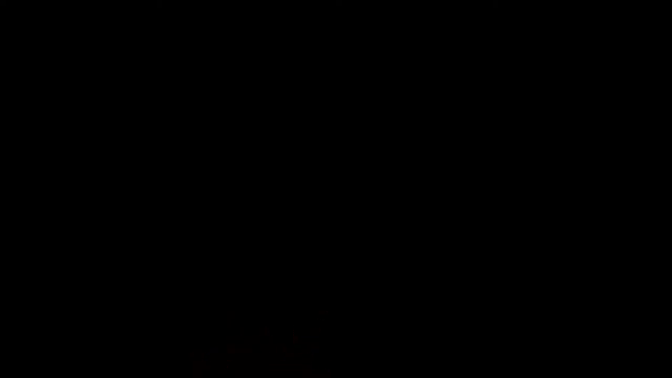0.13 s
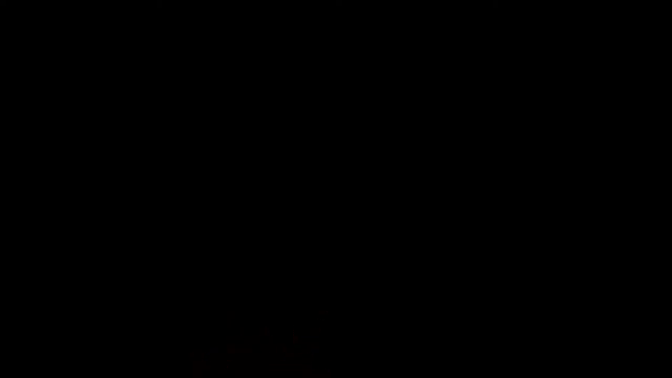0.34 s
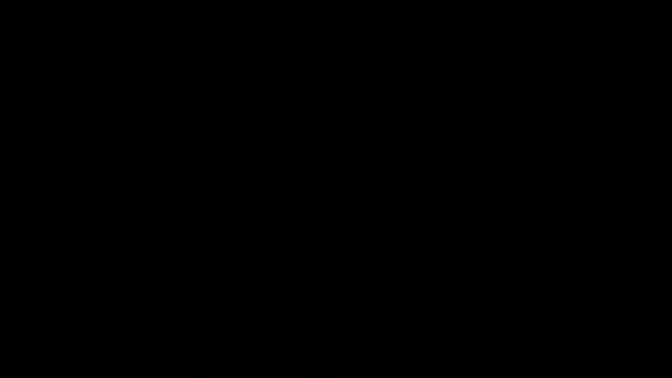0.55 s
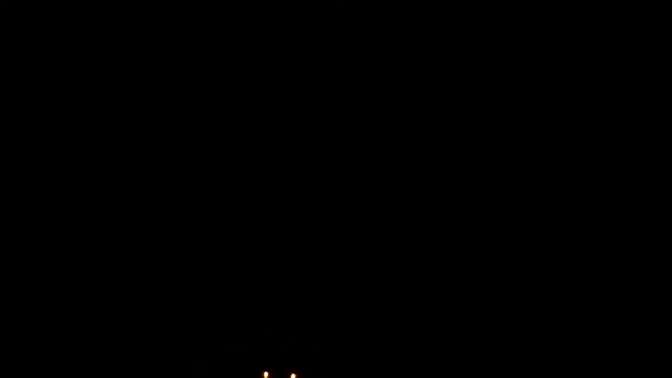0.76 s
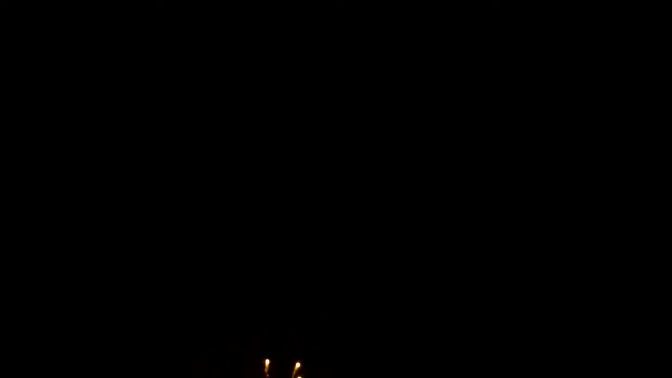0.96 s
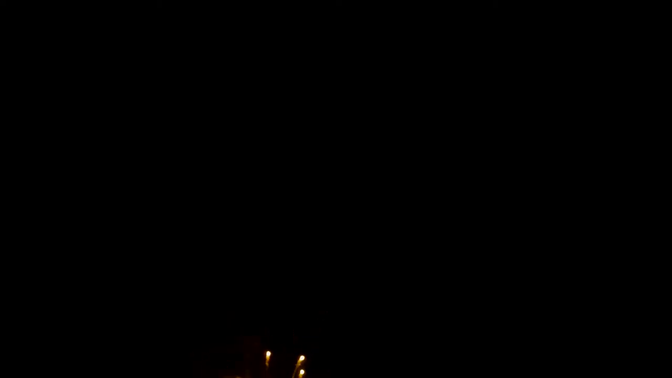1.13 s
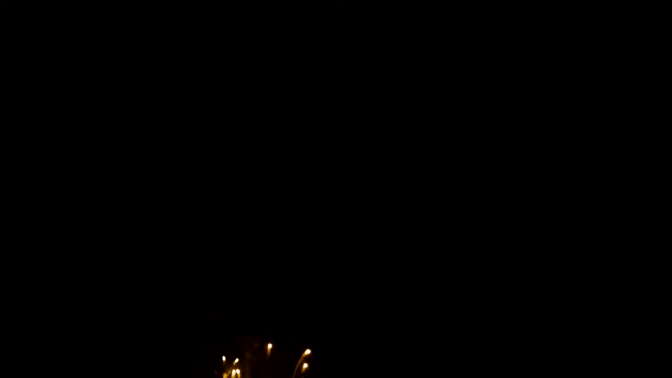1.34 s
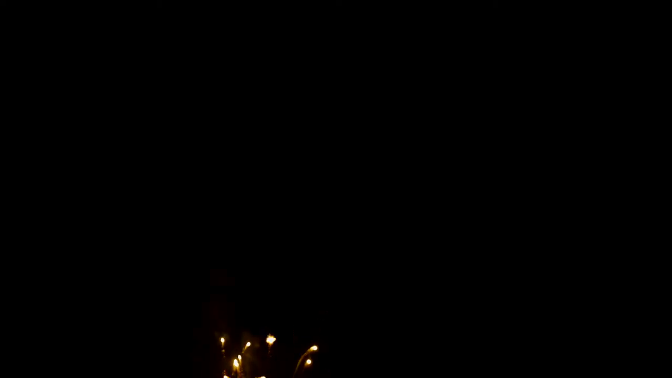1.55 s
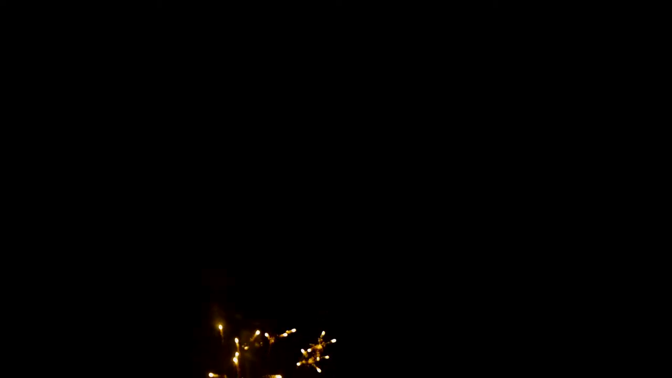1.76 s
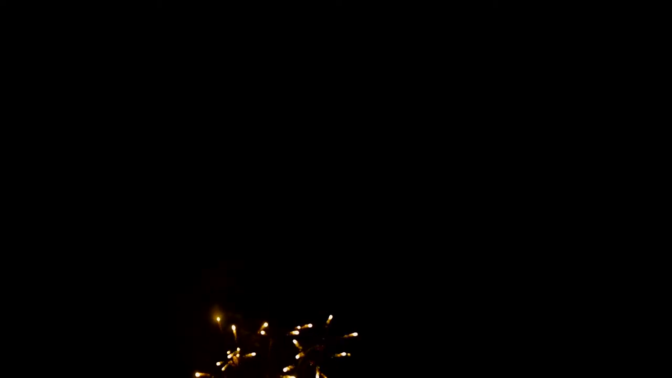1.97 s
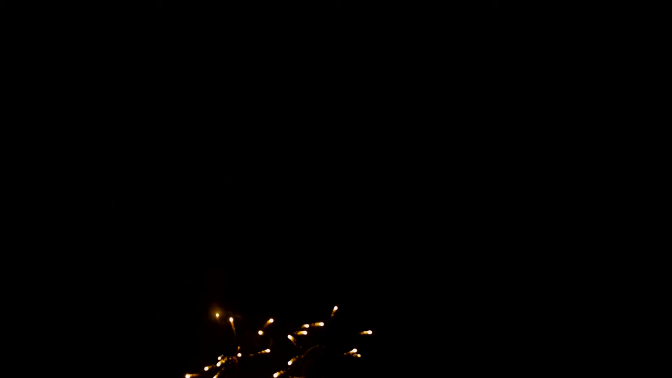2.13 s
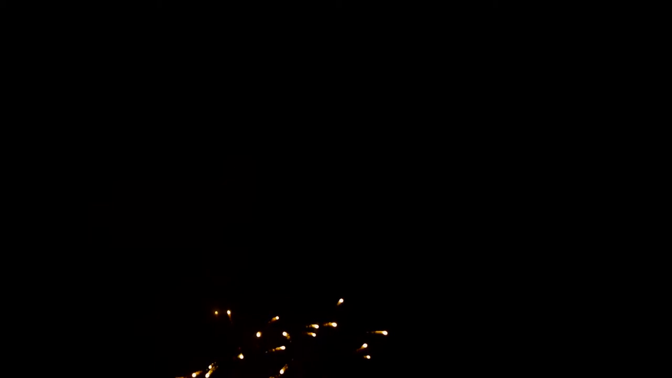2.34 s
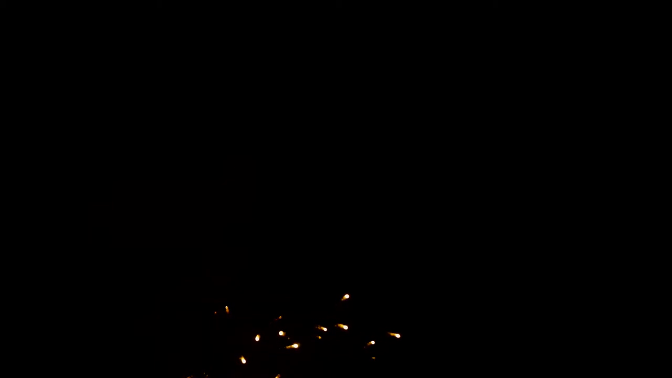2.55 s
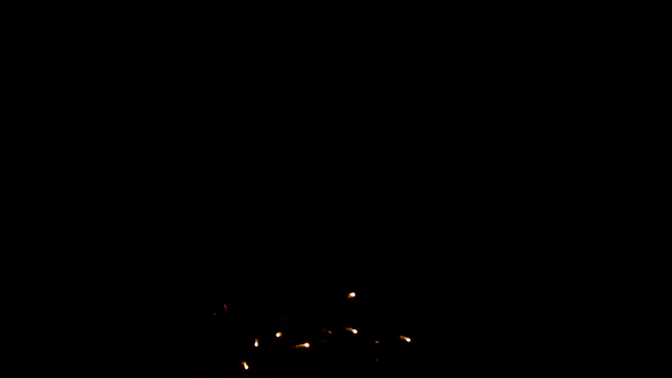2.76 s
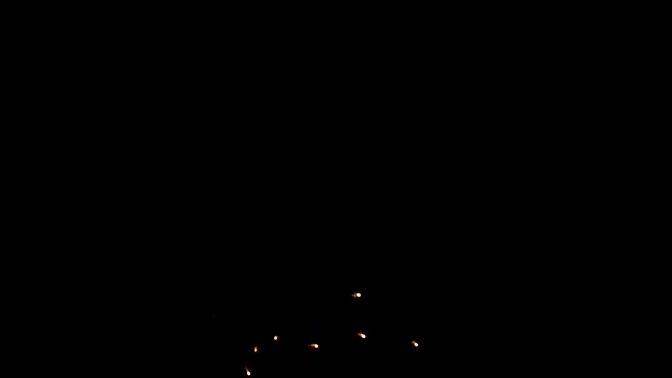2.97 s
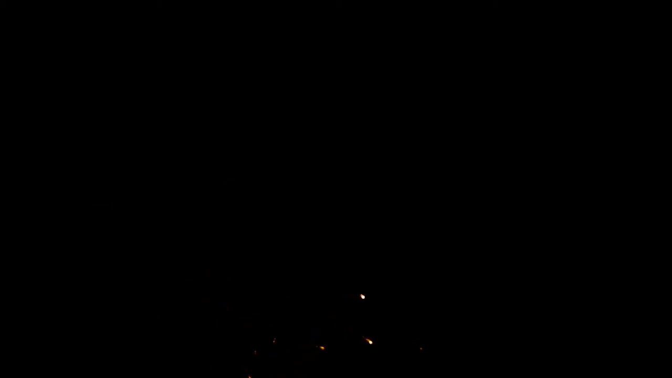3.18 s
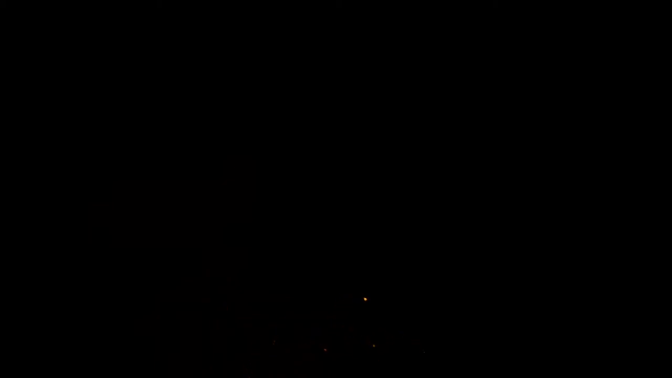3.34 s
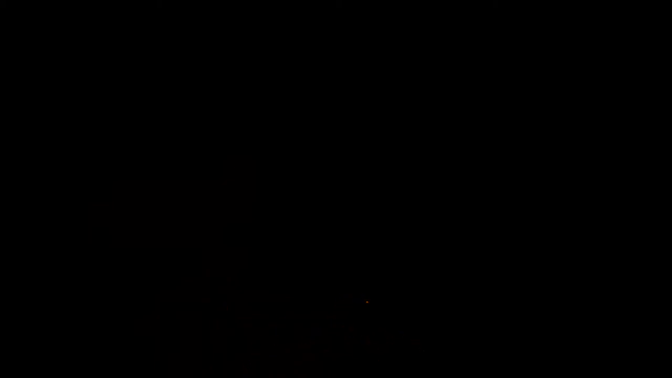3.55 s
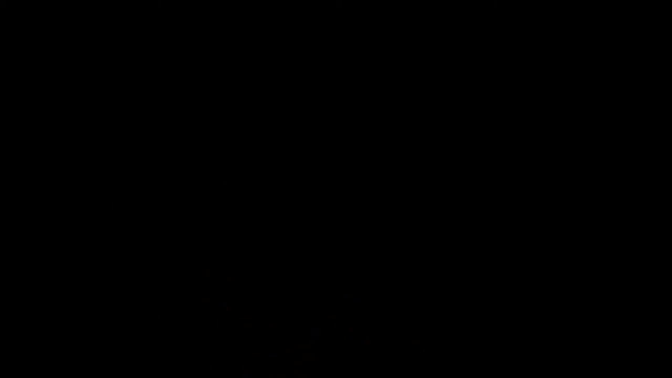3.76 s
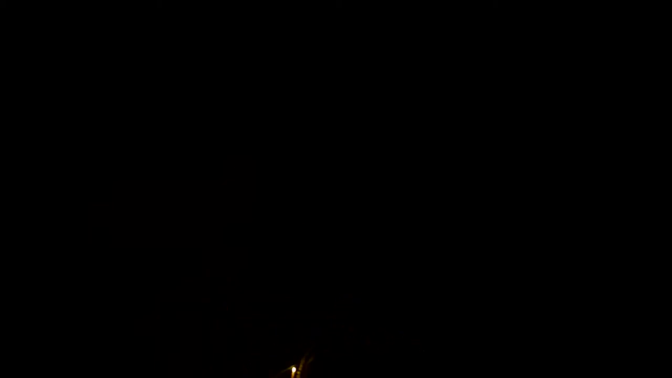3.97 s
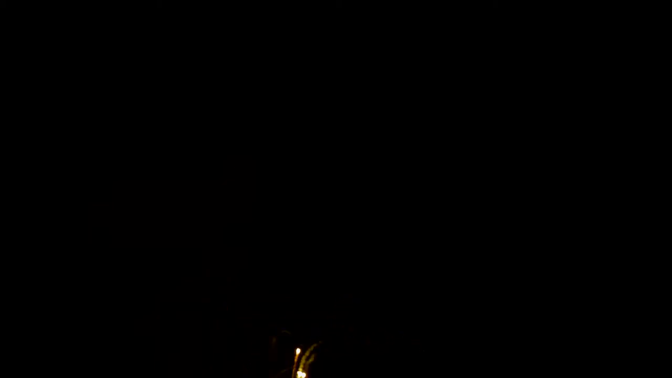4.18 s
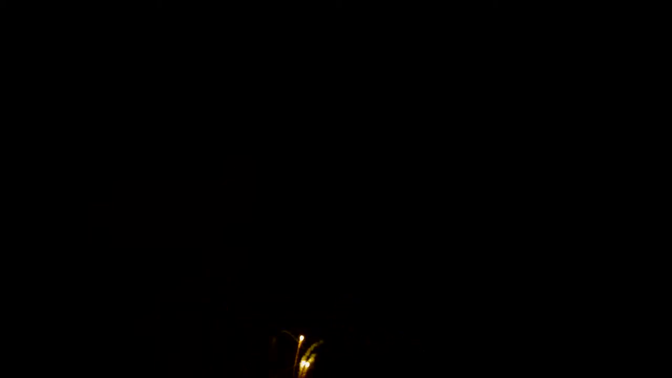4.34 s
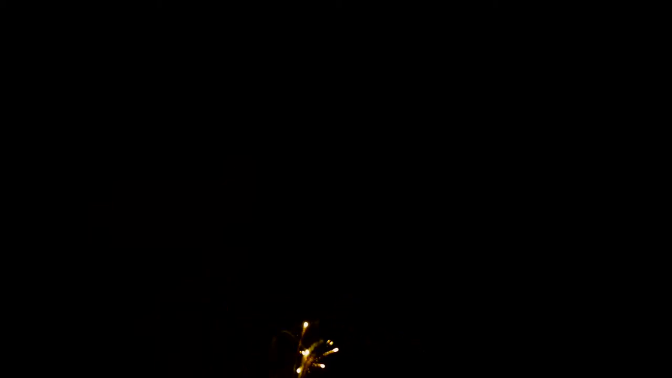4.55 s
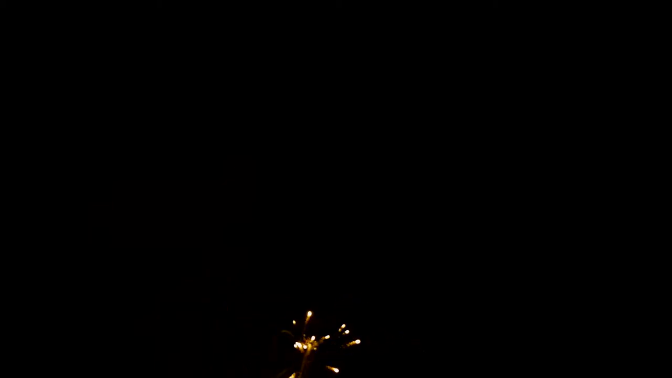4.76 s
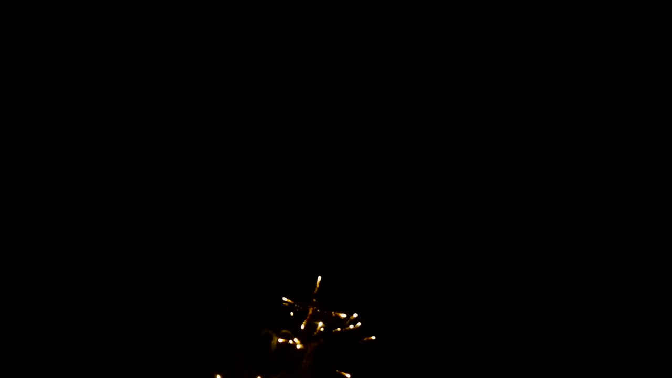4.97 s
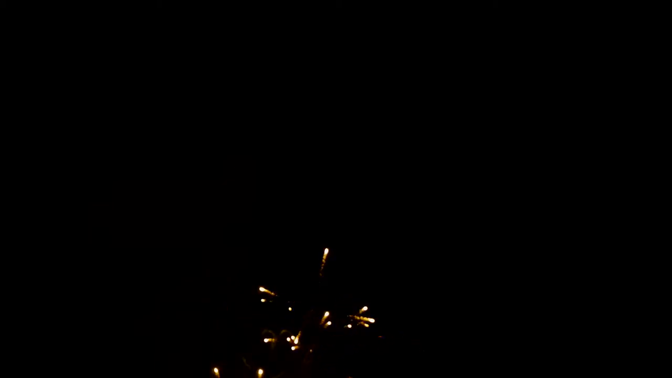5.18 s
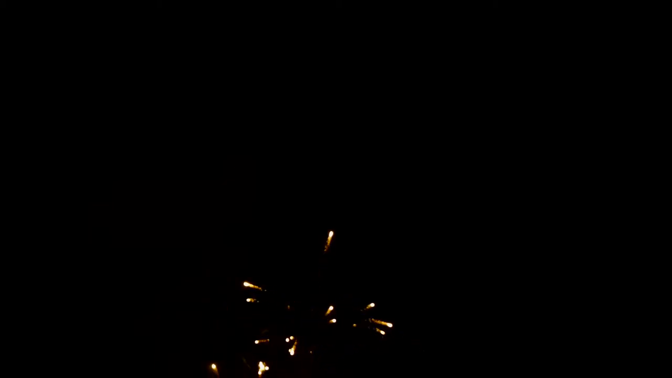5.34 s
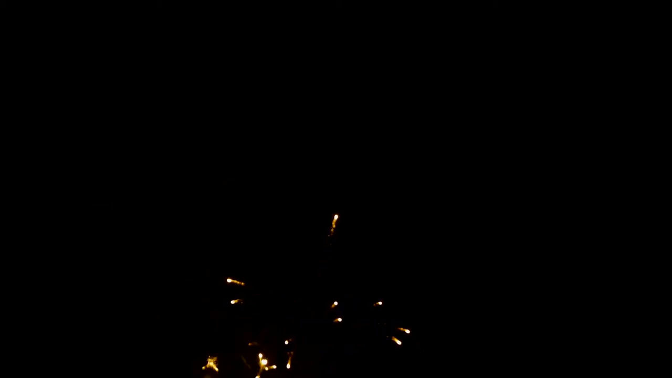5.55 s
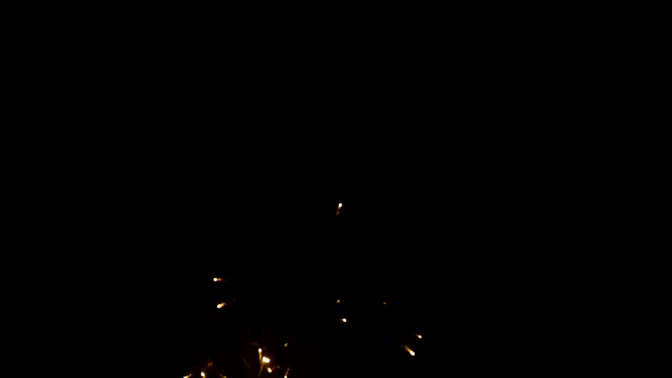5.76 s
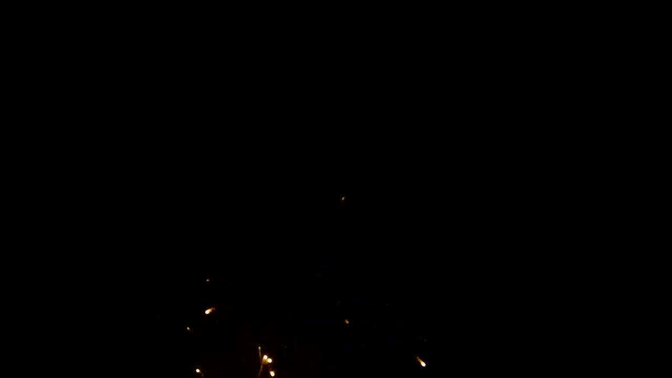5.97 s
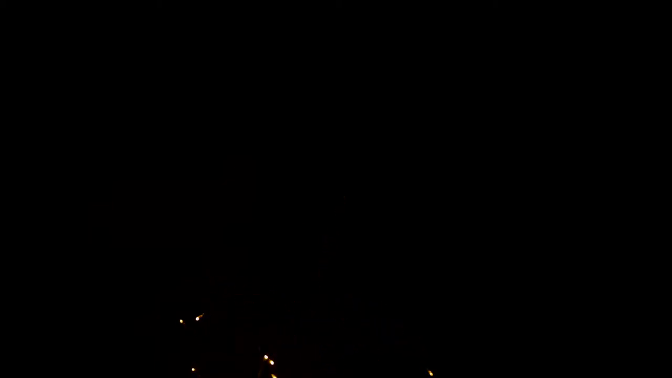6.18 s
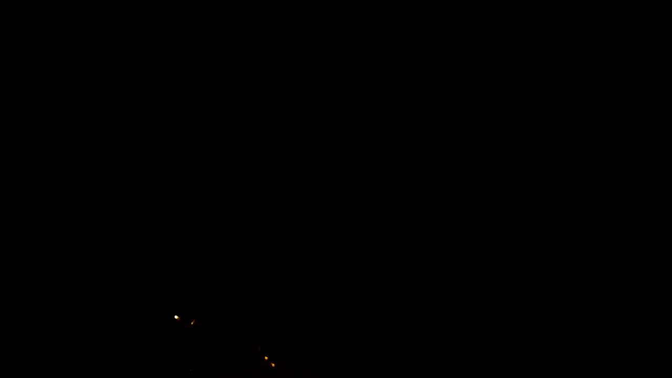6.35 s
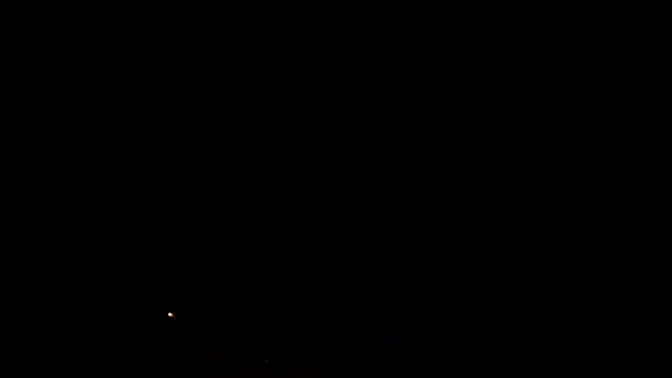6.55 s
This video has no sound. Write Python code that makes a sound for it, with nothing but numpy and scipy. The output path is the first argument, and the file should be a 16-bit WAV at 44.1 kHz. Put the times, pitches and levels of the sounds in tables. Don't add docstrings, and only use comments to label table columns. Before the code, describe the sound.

At night outdoors, small fireworks snap in irregular bursts left of the listener, echoing over the landscape, while large shells thud softly far away.

```python
import sys
import numpy as np
from scipy import signal
from scipy.io import wavfile

SR = 44100
rng = np.random.default_rng(int(sys.argv[2]) if len(sys.argv) > 2 else 0)


def transcribe(signal):
    frames = np.atleast_2d(signal).T
    limited = np.clip(frames, -1, 1)
    pcm = np.round(limited * 32767).astype(np.int16)
    wavfile.write(sys.argv[1], SR, pcm)


def gain_from_db(level_db):
    decades = np.asarray(level_db, float) / 20
    return 10 ** decades


N = 291501

# start_s, level_db, push_ms, ground_share, air_cutoff_hz
STAR_BURSTS = [(0.75241, -14.6, 0.24, .63, 3170), (1.02044, -13.7, 0.36, .71, 3190),
               (1.32155, -7.7, 0.39, .78, 3590), (1.4625, -12.7, 0.39, .63, 3440),
               (1.5667, -8.5, 0.36, .61, 3470), (1.66203, -13.7, 0.85, .27, 3930),
               (1.66233, -10.0, 0.28, .55, 3930), (1.93235, -6.9, 0.32, .78, 3120),
               (3.58164, -10.3, 0.44, .82, 3140), (4.42392, -7.7, 0.35, .69, 3140),
               (4.70384, -8.3, 0.33, .61, 3350), (4.82178, -7.0, 0.47, .77, 3690),
               (4.90606, -14.3, 0.4, .71, 3050), (5.02051, -13.6, 0.56, .98, 2450),
               (5.34243, -23.9, 0.39, .46, 2410), (5.44771, -12.8, 0.43, .43, 1800),
               (5.61325, -8.9, 0.44, .77, 3460)]
WALL_PATHS = [66.2, 64.95, 64.95, 65.8, 67.7, 71, 70.7, 65.25, 66.95, 69.8, 69.85, 70, 63.35, 65.7, 66.6,
              64.3, 64.15]
WALL_FACINGS = [4.5, 4.5, 1.5, 1.1, -1.5, -12, 2, 0.5, 2, -0.5, -0.5, -2, 5, 3.5, 0, 1, 1.6]
# delay_ms, level_db, right_against_left_db
NEAR_REFLECTORS = [(2.5, -26, -6), (4.7, -25.5, -5), (9.8, -21, -14), (24, -30, -8)]
# pitch_hz, level_db, t60_s
LANDSCAPE_BANDS = [(44, -68.5, 1.7), (96, -70, 2.7), (203, -63, 1.5), (370, -67.5, 3.8), (793, -66.5, 3.03),
                   (1630, -72.5, 3.24), (3570, -73.5, 3.58), (5700, -74, 1.66), (8500, -72, 2.4)]
# start_s, level_db, push_ms, knock_db (the rough front)
FAR_SHELLS = [(2.1526, -25.2, 2.6, -51), (2.4008, -21.3, 2.2, -45), (2.7433, -29.2, 5.0, -45.5),
              (5.7065, -25.4, 1.9, -51.5), (6.0275, -22.9, 1.9, -49), (6.2951, -21.7, 2.5, -46.5)]
# delay_s, level_db
HILLSIDES = [(0.062, -27), (0.097, -16), (.185, -19.5)]
# level_db, push_ms, ground_share, air_cutoff_hz
DULL_POP = (-30, 0.1051, 7, 700)
# delay_s, level_db
POP_ECHOES = [(0, 0), (.021, -9), (.067, -9), (.097, -8), (.17, -12), (.23, -13)]
# middle_s, level_db, pitch_hz
DEEP_THUDS = [(0.091, -56.5, 26.1), (0.29, -59, 49.7), (.64, -57, 23.7), (1.212, -56, 27), (1.76, -61, 26),
              (3.999, -54.5, 28), (4.55, -58.5, 26.2), (5.12, -57, 27)]
# low_hz, high_hz
FLICKER_BANDS = [(13500, 14300), (14300, 15000)]
# pitch_hz, level_db (per Hz)
NIGHT_SPECTRUM = [(80, -14.5), (130, -13), (300, -16), (650, -21), (1000, -21.5), (1350, -32), (2200, -40),
                  (4200, -48.5), (7500, -65), (9000, -57), (10500, -57.5), (13500, -43.5)]
# pitch_hz, likeness (0-1)
NIGHT_LIKENESS = [(60, 0.95), (190, 0.9), (610, 0.76), (1930, 0.86), (6120, 0.17)]
# pitch_hz, left_minus_right_db
NIGHT_SIDES = [(60, 9), (250, 7), (500, -0.5), (6000, 0)]

SHOW_PAN_DB = -5.9


def rms_one(x):
    return x / np.sqrt(np.mean(x ** 2) + 1e-20)


def at_hz(points, hz):
    point_hz, value = np.array(points).T
    return np.interp(np.log(hz), np.log(point_hz), value)


def passed(x, hz, kind, order=2):
    return signal.sosfilt(signal.butter(order, hz, kind, fs=SR, output="sos"), x)


def sides(right_db):
    return np.array([[1], [gain_from_db(right_db)]])


def add(out, sound, start_s):
    at = int(start_s * SR)
    out[..., at:at + sound.shape[-1]] += sound[..., :N - at]


def drift(rate_hz):
    knots = rng.standard_normal(int(N / SR * rate_hz) + 2)
    return np.interp(np.arange(N) / SR * rate_hz, np.arange(len(knots)), knots)


def pair(alike, size):
    mid, side = rng.standard_normal((2, size))
    alike = np.clip(alike, 0, 1)
    return np.sqrt((1 + alike) / 2) * mid + np.sqrt((1 - alike) / 2) * side * [[1], [-1]]


def blast(start_s, push_ms, fall=1.3, size=400):
    ms = (np.arange(size) - start_s * SR % 1) * 1000 / SR
    u = np.clip(ms, 0, None) / push_ms
    onset = np.clip(ms * SR / 1000 + .5, 0, 1)
    return -(1 - u) * np.exp(-fall * u) * onset


def crack(start_s, level_db, push_ms, ground, air_hz, fall=1.3):
    ground_delay_ms, port_cut_hz = .2, 187
    wave = blast(start_s, push_ms, fall)
    sample = np.arange(len(wave))
    bounce = np.interp(sample - ground_delay_ms * SR / 1000, sample, wave, left=0)
    wave = wave + ground * passed(bounce, 6500, "low", order=1)
    steep = 0.017 * gain_from_db(.55 * (level_db + 8.5)) * (air_hz / 3400) ** 2.7
    front = steep * passed(wave, [6000, 11500], "band")
    wave = passed(wave, air_hz, "low", order=3) - front
    return gain_from_db(level_db) * passed(wave, port_cut_hz, "high", order=1)


def star_fall(push_ms):
    return 1.24 * (push_ms / 0.45) ** -0.54


def stars():
    low_star_db, usual_ground = 12.5, 0.76
    free, out = np.zeros(N), np.zeros((2, N))
    for start_s, level_db, push_ms, ground, air_hz in STAR_BURSTS:
        fall = star_fall(push_ms)
        direct = crack(start_s, level_db, push_ms, ground, air_hz, fall)
        add(out, direct * sides(SHOW_PAN_DB), start_s)
        add(out, signal.fftconvolve(direct[None], scatter(), axes=1), start_s)
        charge = gain_from_db(low_star_db * (ground - usual_ground))
        add(free, charge * crack(start_s, level_db, push_ms, 0, air_hz, fall), start_s)
    return free, out


def scatter():
    start_s, start_db, loss_db_per_s, floor_db = .0015, -42.5, 554.5, -62
    s = np.arange(int(.06 * SR)) / SR
    uneven = gain_from_db(4.14 * rng.exponential(1, len(s)))
    envelope = gain_from_db(np.maximum(start_db - loss_db_per_s * s, floor_db)) * (s > start_s)
    taps = envelope * rms_one(uneven * pair(0.42, size=len(s)))
    taps = passed(taps, 2800, "low", order=1) * sides(-8.0)
    single = np.zeros_like(taps)
    chances = rng.standard_normal((len(NEAR_REFLECTORS), 2))
    for (delay_ms, level_db, right_db), (shift, change) in zip(NEAR_REFLECTORS, chances):
        reflection = gain_from_db(level_db + 0.98 * change) * sides(right_db)
        add(single, reflection, delay_ms * (1 + 0.041 * shift) / 1000)
    return taps + passed(single, 1400, "low", order=1)


def wall():
    loss_db, push_share, cut_hz = 8.5, 0.48, 1015
    brightens_per_db, sharpens = .08, 0.85
    second_delay_ms, second_db = 5.7, -11
    out = np.zeros((2, N))
    for (star_s, star_db, star_ms, *_), path_ms, facing_db in zip(STAR_BURSTS, WALL_PATHS, WALL_FACINGS):
        start_s, push_ms = star_s + path_ms / 1000, push_share * star_ms
        level_db = star_db - loss_db + facing_db
        dull = crack(start_s, level_db, push_ms, 0.51, cut_hz * np.exp(brightens_per_db * facing_db))
        sharp = crack(start_s, level_db - 17.5 + sharpens * facing_db, push_ms, 0.19, 3600)
        add(out, np.convolve(dull + sharp, rough_wall()) * sides(-17), start_s)
        second = gain_from_db(second_db) * (dull + 1.7 * sharp) * sides(-20.5)
        add(out, second, start_s + second_delay_ms / 1000)
    return out


def rough_wall():
    rough_db, fade_ms = -25.5, 4.2
    ms = np.arange(int(.025 * SR)) * 1000 / SR
    uneven = gain_from_db(5.2 * rng.exponential(1, len(ms))) * rng.standard_normal(len(ms))
    return (ms == 0) + gain_from_db(rough_db) * rms_one(uneven) * np.exp(-ms / fade_ms)


def landscape(free):
    start_s, rise_s = .03, 0.049
    early_db, early_fade_s = 16.5, .15
    late_db, late_gain_db_per_s = -6.5, 6.5
    ridge_s, ridge_width_s, ridge_db = .24, 0.054, 2.5
    s = np.arange(3 * SR) / SR
    ridge = ridge_db * np.exp(-((s - ridge_s) / ridge_width_s) ** 2)
    shape_db = early_db * np.exp(-s / early_fade_s) + late_db + late_gain_db_per_s * s + ridge
    build = np.clip((s - start_s) / rise_s, 0, 1) ** 2 * gain_from_db(shape_db)
    clumps = gain_from_db(3.0 * drift(120))[:len(s)]
    response = 0
    for hz, level_db, t60_s in LANDSCAPE_BANDS:
        band = passed(clumps * pair(0.49, size=len(s)), [hz / np.sqrt(2), hz * np.sqrt(2)], "band")
        decay = gain_from_db(level_db - 60 * s / t60_s)
        response = response + rms_one(band) * np.sqrt(hz / 1000) * decay
    return signal.fftconvolve(free[None], response * build * sides(-6.0), axes=1)[:, :N]


def shells():
    blasts, knocks = np.zeros(N), np.zeros(N)
    fading = np.exp(-np.arange(900) / SR / 0.008)
    for start_s, level_db, push_ms, knock_db in FAR_SHELLS:
        add(blasts, gain_from_db(level_db) * blast(start_s, push_ms, fall=.8, size=3000), start_s)
        add(knocks, gain_from_db(knock_db + 4.5) * fading * rng.standard_normal(len(fading)), start_s)
    thump = passed(blasts, 63, "low")
    out = thump + 0.11 * passed(blasts, 400, "low")
    out = out + .08 * passed(blasts, [190, 520], "band")
    out = out + passed(knocks, [160, 600], "band")
    echo = thump + .25 * passed(blasts, [150, 450], "band")
    for delay_s, level_db in HILLSIDES:
        add(out, gain_from_db(level_db) * echo, delay_s)
    r, w = np.exp(-np.pi * 28 / SR), 2 * np.pi * 23 / SR
    out = signal.lfilter([1, -2, 1], [1, -2 * r * np.cos(w), r * r], out + 1e-18)
    far_pop(out)
    return out


def far_pop(out):
    start_s = 6.3175
    for delay_s, level_db in POP_ECHOES:
        add(out, gain_from_db(level_db) * crack(start_s, *DULL_POP), start_s + delay_s)


def deep_thuds():
    half_s = .07
    out, s = np.zeros(N), np.arange(int(.14 * SR)) / SR
    for middle_s, level_db, hz in DEEP_THUDS:
        swell = np.exp(-((s - half_s) / 0.021) ** 2)
        add(out, gain_from_db(level_db) * swell * np.sin(2 * np.pi * hz * s), middle_s - half_s)
    return out * sides(SHOW_PAN_DB)


def rumble():
    rest_db, star_stirs_db, shell_stirs_db, fade_s = -72, -75, -71.5, 0.57
    t, power = np.arange(N) / SR, gain_from_db(2 * rest_db)
    for bursts, stir_db in ((STAR_BURSTS, star_stirs_db), (FAR_SHELLS, shell_stirs_db)):
        for start_s, *_ in bursts:
            power = power + gain_from_db(2 * stir_db) * (t > start_s) * np.exp(-np.abs(t - start_s) / fade_s)
    wander = gain_from_db(2.0 * drift(9.9))
    roll = rms_one(passed(pair(.92, size=N), [22, 85], "band"))
    return np.sqrt(power) * wander * roll * sides(-5.0)


def high_flickers():
    level_db, stops_s, fade_s = -99, 1.55, .25
    early_share, late_share = .4, -1.3
    stopping = np.clip((np.arange(N) / SR - stops_s) / fade_s, 0, 1)
    ready, out = early_share + stopping * (late_share - early_share), 0
    for band_hz in FLICKER_BANDS:
        flickers = np.clip(3 * (drift(30) + ready), 0, 1)
        out = out + flickers * rms_one(passed(pair(0.86, size=N), band_hz, "band", order=6))
    return gain_from_db(level_db) * out


def steady_insects():
    level_db, pitch_hz = -105, 5750
    band = passed(pair(.3, size=N), [pitch_hz - 320, pitch_hz + 300], "band")
    return gain_from_db(level_db) * rms_one(band)


def night():
    level_db = -72
    out, edges = 0, 90 * 2 ** np.arange(0, 7.6, .5)
    for low, high in zip(edges, edges[1:]):
        hz = np.sqrt(low * high)
        band = passed(pair(at_hz(NIGHT_LIKENESS, hz), size=N), [low, high], "band")
        flicker = gain_from_db(at_hz(NIGHT_SPECTRUM, hz) + 0.43 * drift(2.8))
        out = out + flicker * band * sides(-at_hz(NIGHT_SIDES, hz))
    return gain_from_db(level_db) * passed(rms_one(out), 11850, "low", order=24)


def scene():
    free, cracks = stars()
    thuds = shells()
    show = cracks + thuds * sides(SHOW_PAN_DB) + landscape(free + thuds)
    background = night() + rumble() + steady_insects()
    return show + background + deep_thuds() + high_flickers() + wall()


def lifted(x, hz, width_hz, lift):
    r, w = np.exp(-np.pi * width_hz / SR), 2 * np.pi * hz / SR
    return x + lift * signal.lfilter([(1 - r * r) / 2, 0, (r * r - 1) / 2], [1, -2 * r * np.cos(w), r * r], x)


def roll_off(x):
    return signal.sosfilt(signal.butter(12, 15500, fs=SR, output="sos"), x)


def record(dry):
    coloured = lifted(dry, 840, 590, 0.088)
    coloured = lifted(coloured, 6050, 3100, 1)
    coloured = lifted(coloured, 3300, 750, -0.27)
    return roll_off(coloured)


dry = scene()
out = record(dry)
transcribe(out)
```